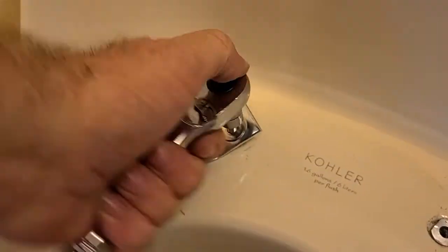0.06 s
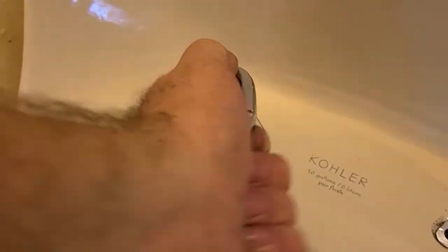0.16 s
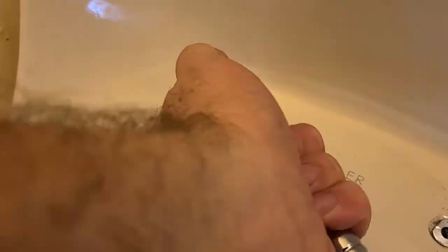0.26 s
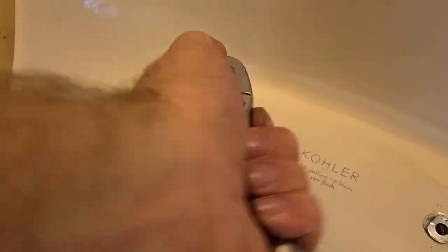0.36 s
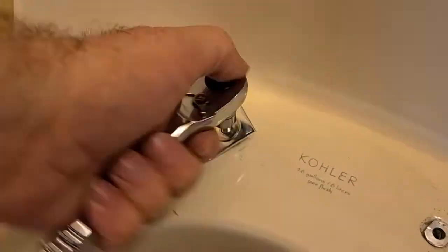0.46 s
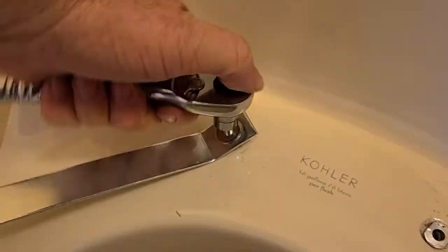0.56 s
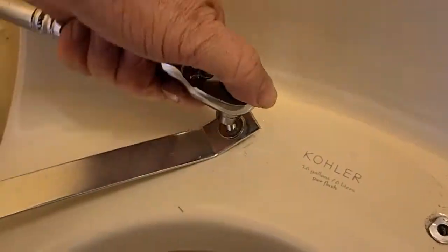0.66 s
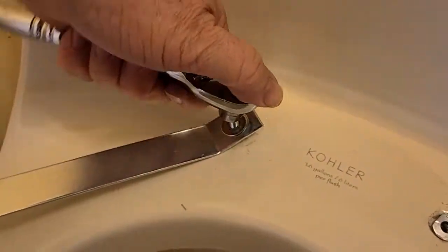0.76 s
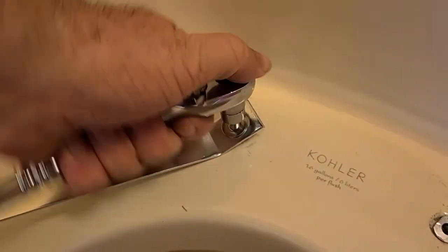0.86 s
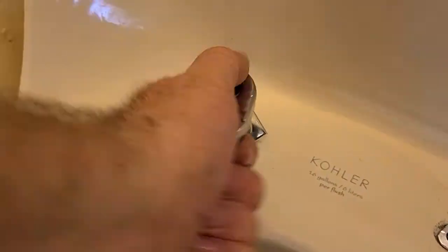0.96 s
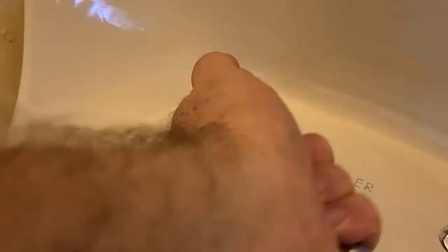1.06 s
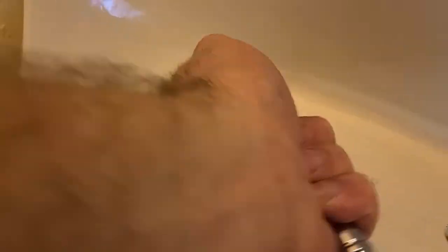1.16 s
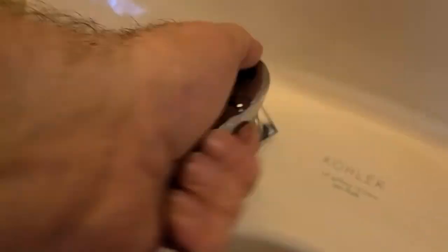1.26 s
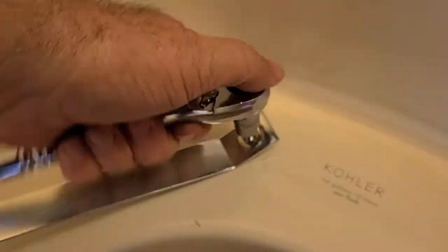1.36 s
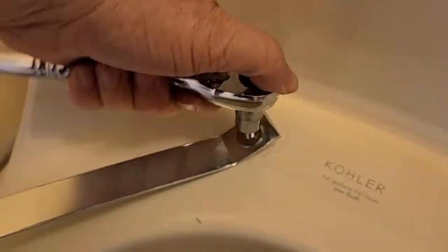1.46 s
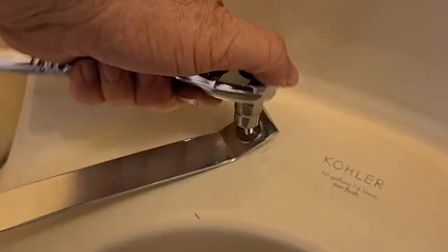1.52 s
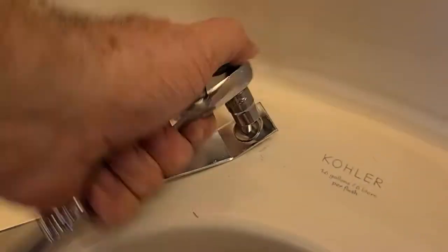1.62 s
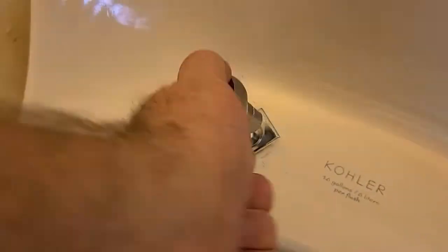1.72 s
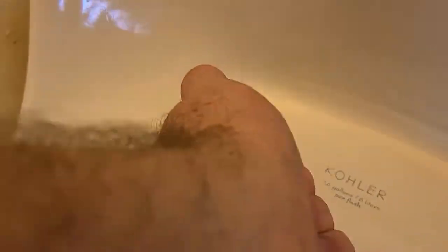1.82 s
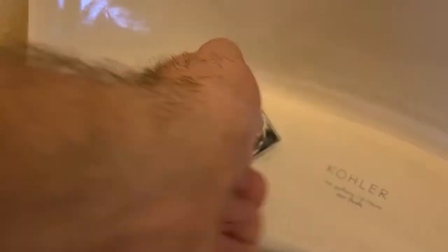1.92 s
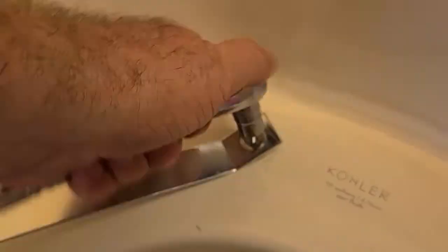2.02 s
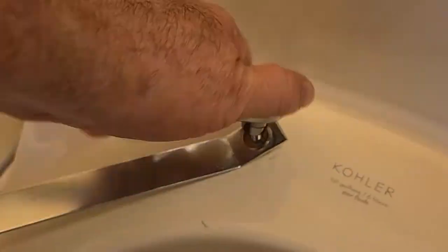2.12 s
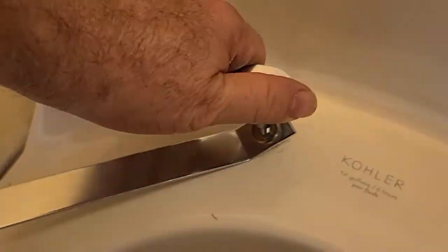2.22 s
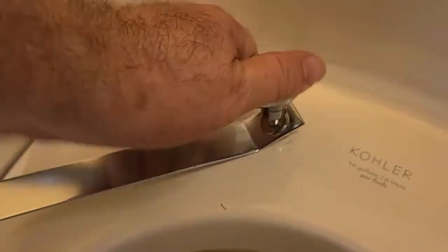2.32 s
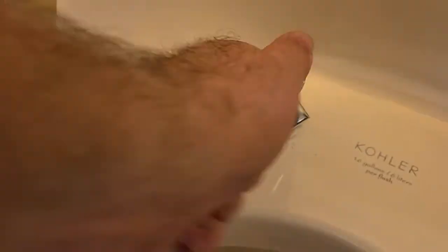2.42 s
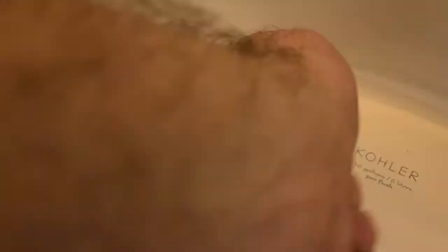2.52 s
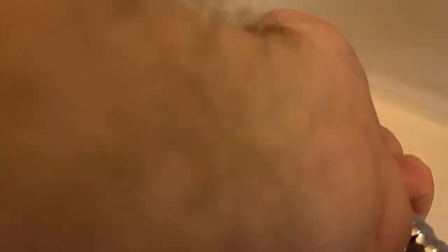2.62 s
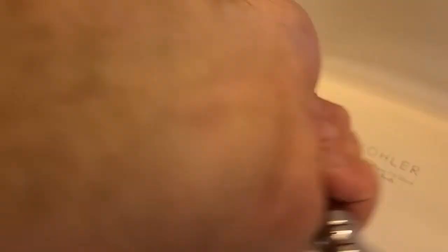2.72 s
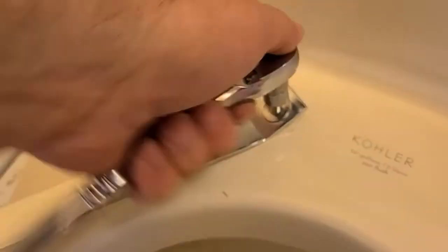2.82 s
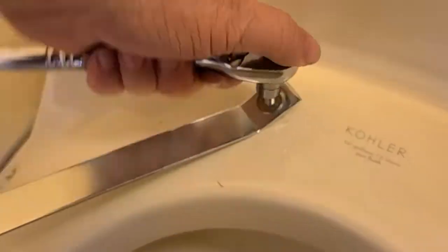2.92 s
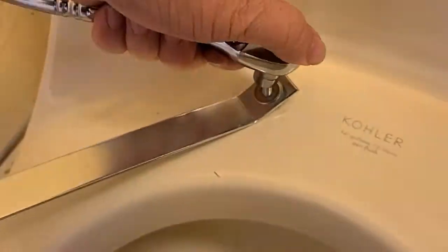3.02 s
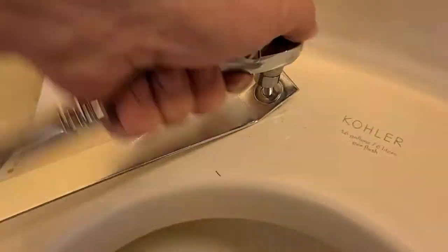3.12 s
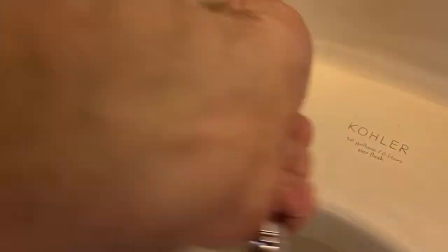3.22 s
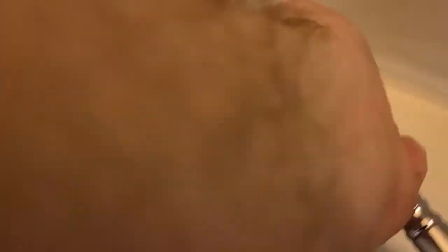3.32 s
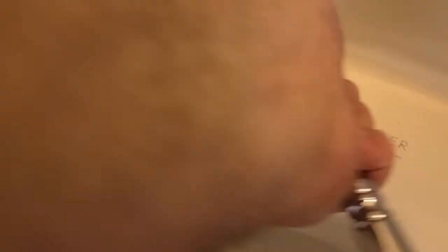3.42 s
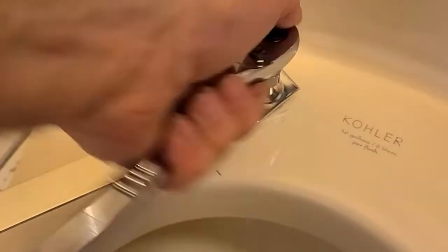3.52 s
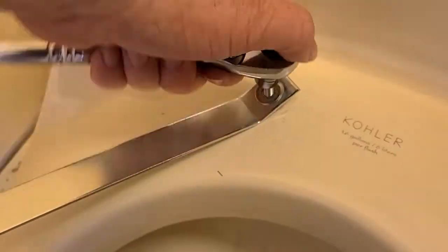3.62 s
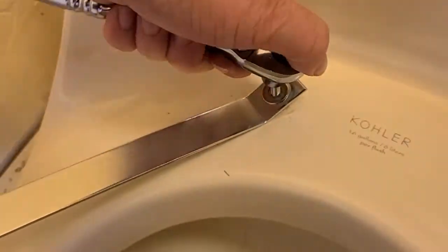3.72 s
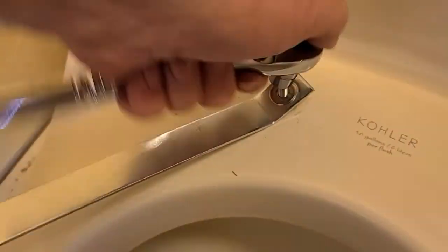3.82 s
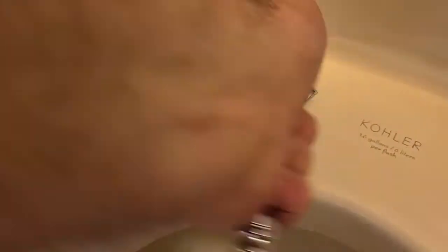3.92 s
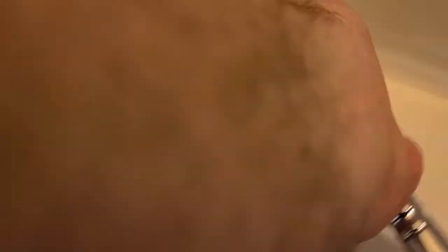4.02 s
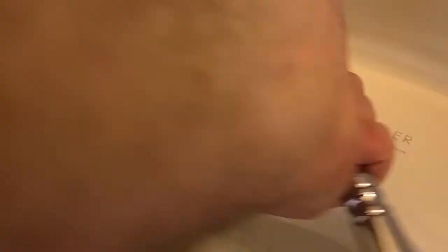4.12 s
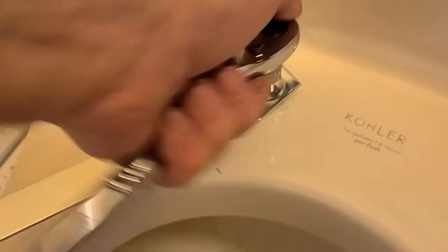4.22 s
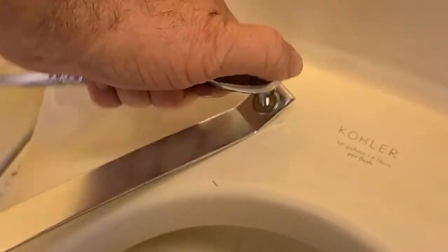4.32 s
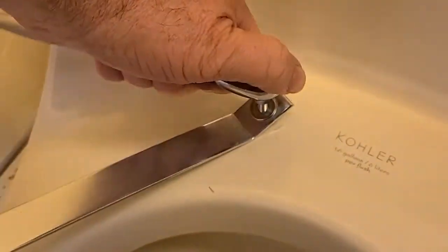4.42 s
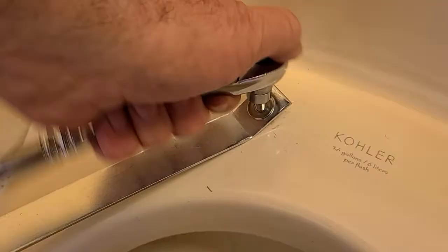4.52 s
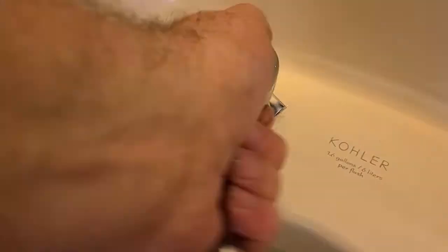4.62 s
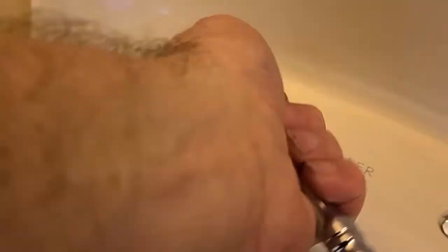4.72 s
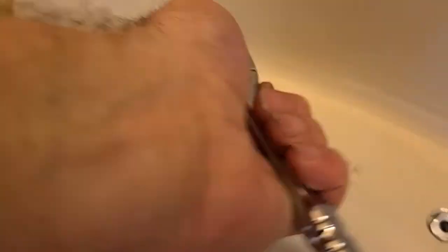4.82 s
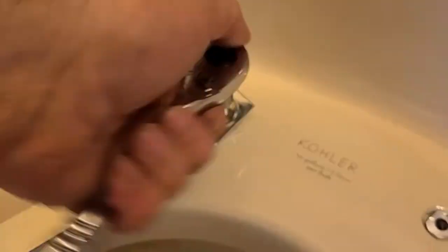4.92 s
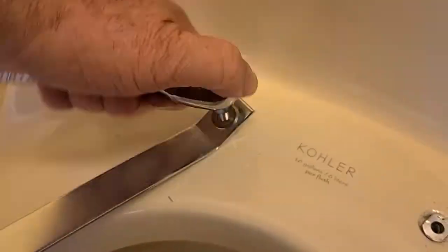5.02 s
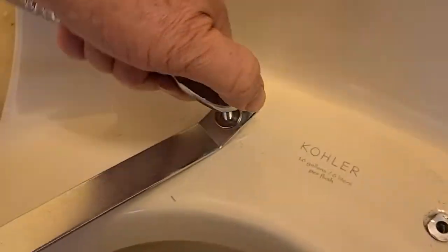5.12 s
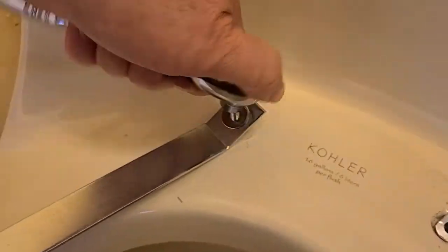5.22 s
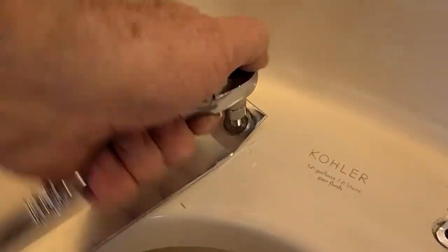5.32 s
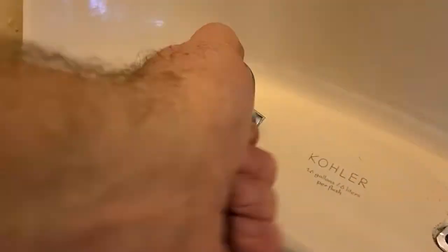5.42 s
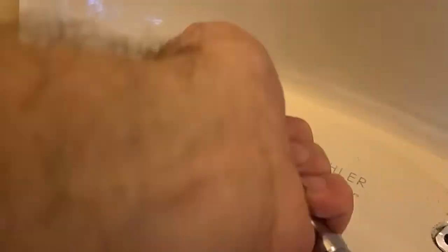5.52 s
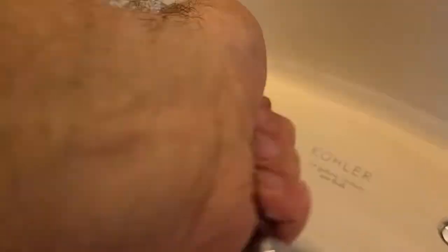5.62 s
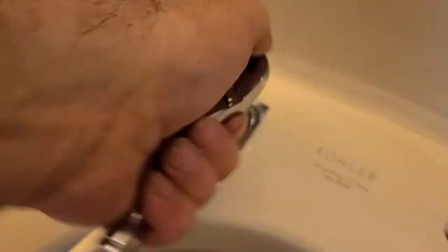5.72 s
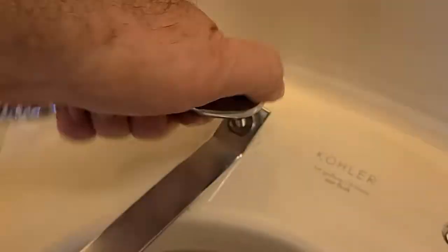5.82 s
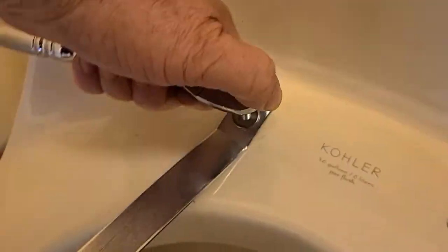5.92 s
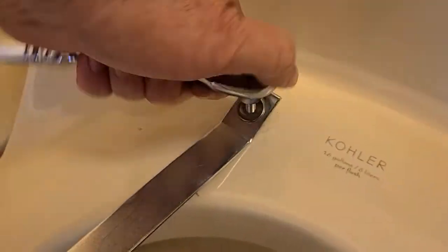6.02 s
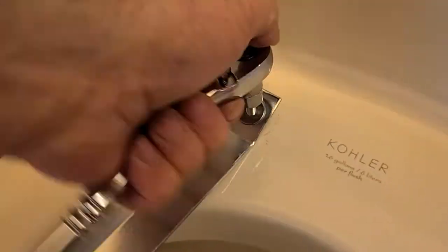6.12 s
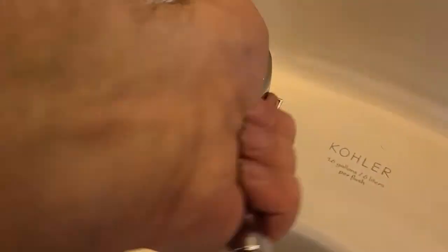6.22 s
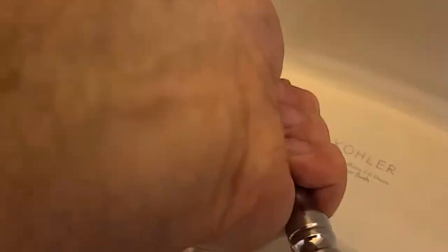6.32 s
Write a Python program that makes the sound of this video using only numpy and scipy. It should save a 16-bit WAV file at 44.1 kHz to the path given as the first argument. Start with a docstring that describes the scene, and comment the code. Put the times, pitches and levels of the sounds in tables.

```python
"""A socket ratchet tightens a bolt on a steel strap over a porcelain bowl, close by in a small tiled bathroom.
From the start a faint hum and rumble fill the room (sines, low noise), and the socket knocks on the bolt
(noise bursts, damped steel modes, bowl resonances). Soon come runs of pawl clicks, mostly fastest in mid-swing
(hard noise snaps, short modes of the head), with clicks placed one by one and more rattling among them.
The hand rubs in swells (uneven noise, tiny ticks); from the second run on, the microphone is jogged at times."""
import sys
import numpy as np
from scipy import signal
from scipy.fft import rfft, irfft, next_fast_len
from scipy.io import wavfile
from scipy.ndimage import map_coordinates

SR = 44100
rng = np.random.default_rng(int(sys.argv[2]) if len(sys.argv) > 2 else 0)


def master(y):
    """Save y as 16-bit WAV."""
    cut = np.clip(np.atleast_2d(y).T, -1, 1)
    pcm = np.round(cut * 32767)  # scale
    wavfile.write(sys.argv[1], SR, pcm.astype(np.int16))


N = 280455


def amp(db):
    """Level to amplitude ratio: 20 dB is a factor of ten."""
    return 10 ** (np.asarray(db) / 20)


def unit(x):
    """Normalisation to an rms of 1."""
    return x / np.sqrt(np.mean(x ** 2) + 1e-20)


def along(points, hz):
    """Interpolation of (freq_hz, value) points on a logarithmic frequency axis."""
    point_hz, values = np.transpose(points)
    return np.interp(np.log(hz + 1), np.log(point_hz + 1), values)


def filtered(x, response):
    """Linear filtering: the spectrum of x times a complex response of frequency."""
    m = next_fast_len(N + SR // 2)
    return irfft(rfft(x, m) * response(np.fft.rfftfreq(m, 1 / SR)), m)[..., :N]


def coloured(x, spectrum):
    """Minimum-phase filtering: folding the cepstrum makes the given spectrum causal, with unit power gain."""
    def response(hz):
        log_gain = np.log(unit(amp(along(spectrum, hz))))
        cepstrum = irfft(log_gain)
        half = len(cepstrum) // 2
        folded = np.r_[cepstrum[0], 2 * cepstrum[1:half]]
        return np.exp(rfft(folded, len(cepstrum)))
    return filtered(x, response)


def noise(length, alike):
    """Partly correlated stereo noise: the power share `alike` is common to both sides."""
    alike = np.clip(alike, 0, 1)
    common = np.sqrt(alike) * rng.standard_normal(length)
    return common + np.sqrt(1 - alike) * rng.standard_normal((2, length))


def fade(t, attack, t60):
    """Exponential decay by 60 dB in t60 after a rise with the time constant attack."""
    return (1 - np.exp(-t / attack)) * amp(-60 * t / t60)


def add(track, s, sound):
    """Superposition: mix a sound in at time s."""
    part = track[:, max(0, round(s * SR)):][:, :sound.shape[-1]]
    part += sound[..., :part.shape[-1]]


def ring(modes, t, pitch, scatter_db, detune, attack):
    """Modal synthesis: damped sines, with new strengths per blow and new phases per blow and side."""
    out = np.zeros((2, len(t)))
    for hz, db, t60 in modes:
        mode_hz = hz * pitch * (1 + detune * rng.normal())
        phase = 2 * np.pi * mode_hz * t + rng.normal(0, 1.0, (2, 1))
        strength = amp(db + scatter_db * rng.normal())
        out += strength * fade(t, attack, t60) * np.sin(phase)
    return out


def background():
    """Steady tones of mains hum stand over low broadband rumble of the room air."""
    # mains hum: freq_hz, rms_level_db
    hum_tones = [(59, -54.5), (120, -56)]
    # spectrum of the rumble: freq_hz, relative_db (per Hz)
    air_spectrum = [(20, -19), (60, -2), (125, -6), (190, -26.5), (450, -14.5), (650, -41), (1200, -31.5),
                    (2600, -43), (6800, -36), (8200, -51.5), (16000, -71.5)]
    t = np.arange(N) / SR
    hum = sum(amp(db) * np.sqrt(2) * np.sin(2 * np.pi * (hz * t + rng.random())) for hz, db in hum_tones)
    return hum + amp(-53.5) * coloured(noise(N, alike=0.5), air_spectrum)


def bathroom(x, near_db, near_t60, tail_db):
    """Reverberation: the small bowl reflects only short waves, in a quick cluster; the tiled walls ring on."""
    # decay time of the tiled walls: freq_hz, t60_s
    tile_decay = [(300, 0.23), (1000, 0.37), (3500, 0.23), (14000, 0.14)]
    # stereo width of the tiles' echo: freq_hz, side_over_middle (amplitude ratio)
    tile_width = [(250, 0.099), (600, 0.28), (1200, 1), (14000, 0.23)]
    hz, t, (middle, side) = signal.stft(rng.standard_normal((2, SR * 3 // 4)), SR, nperseg=256)
    side = side * along(tile_width, hz)[:, None]
    diffuse = np.array([middle + side, middle - side])
    decay = fade(t, 0.00067, along(tile_decay, hz)[:, None])
    tail = signal.istft(diffuse * decay, SR, nperseg=256)[1]
    near = rng.standard_normal(tail.shape) * fade(np.arange(tail.shape[1]) / SR, 0.003, near_t60)
    near = signal.lfilter(*signal.butter(2, 2500, "high", fs=SR), near)
    echoes = amp(near_db) * near / np.linalg.norm(near[0]) + amp(tail_db) * tail / np.linalg.norm(tail[0])
    return signal.fftconvolve(x, echoes, axes=1)[:, :N]


def bumps():
    """Handling noise: each jog of the hand-held microphone is a low, decaying thump."""
    # soft bumps: start_s, relative_db
    jogs = [(1.39, -47), (2.13, -41.5), (3.41, -49), (4.059, -45)]
    # spectrum of a bump: freq_hz, relative_db (per Hz)
    bump_spectrum = [(20, -16), (45, 14), (90, 7), (200, -76), (1000, -98.5)]
    t = np.arange(N) / SR
    level = sum(amp(db) * fade(np.maximum(t - s, 0), attack=0.02, t60=0.54) for s, db in jogs)
    return amp(10) * level * coloured(noise(N, alike=0.58), bump_spectrum)


def hand():
    """Sliding friction: skin on the handle makes an uneven hush that swells with each pull, and ticks at catches."""
    # rubs as the hand pulls: peak_s, relative_db
    rubs = [(1.08, -58), (2.2, -40), (3.4, -56.5), (4.08, -45.5), (4.82, -56), (5.35, -51)]
    # spectrum of the hush: freq_hz, relative_db (per Hz)
    skin_spectrum = [(200, 8.5), (450, 5), (800, 3), (1300, 0), (2000, -4), (3000, -6), (6000, -20.5),
                     (16000, -40)]
    # spectrum of the ticks: freq_hz, relative_db (per Hz)
    tick_spectrum = [(200, -0.5), (1200, -12.5), (2000, 7), (2600, -11), (3600, 10), (4500, -10.5),
                     (7000, -21), (12000, -33.5)]
    rest_db, slope_db_per_s = -60.5, 74  # resting grip; fall to either side of a rub
    flutter_db, ticks_per_s = 2.5, 10  # unevenness of the sliding; mean rate of the catches
    t = np.arange(N) / SR
    level = amp(rest_db) + sum(amp(db - slope_db_per_s * np.abs(t - s)) for s, db in rubs)
    unevenness = map_coordinates(rng.standard_normal(N // 1024 + 4), [np.arange(N) / 1024])
    hush = amp(flutter_db * unevenness) * coloured(noise(N, alike=0.3), skin_spectrum)
    catches = (rng.random(N) < ticks_per_s / SR) * amp(5.9 * rng.standard_normal(N))
    tick_level = signal.fftconvolve(catches, fade(t[:SR // 20], attack=0.00064, t60=0.025))[:N]
    ticks = tick_level * noise(N, alike=0.8)
    return level * (hush + coloured(ticks, tick_spectrum))


def bowl(force):
    """Forced resonance: the porcelain answers a force as a sum of band-pass modes of alternating sign."""
    # resonances of the porcelain: centre_hz, width_hz, relative_db
    resonances = [(150, 35, -12), (270, 100, -10), (380, 90, -7), (472, 30, 2), (640, 55, -1), (767, 30, 3),
                  (1130, 170, -1.5), (1995, 50, -3)]

    def response(f):
        total = 0
        for k, (centre, width, db) in enumerate(resonances):
            damping = 1j * f * width
            total = total + (-1) ** k * amp(db) * damping / (centre * centre - f * f + damping)
        return unit(total)
    return filtered(force, response)


def socket():
    """Impact excitation: loose steel slips and chatters on the bolt, rings on, and thumps the bowl."""
    # knocks of socket and strap: start_s, contacts, clank_db, thud_db (relative)
    knocks = [(0.026, 1, -36.5, -44.5), (0.347, 1, -44, -50), (0.635, 1, -43, -42.5),
              (0.831, 1, -43.5, -54), (0.901, 1, -48, -46.5), (1.195, 1, -42, -49), (1.594, 1, -33, -33.5),
              (1.669, 1, -41.5, -40.5), (1.924, 1, -34.5, -40), (2.174, 2, -22, -34),
              (2.412, 4, -11.5, -37), (2.547, 1, -26.5, -44.5), (2.983, 1, -32, -34.5),
              (3.321, 1, -36.5, -37.5), (3.377, 1, -43, -57.5), (3.422, 1, -40.5, -50),
              (4.106, 1, -37.5, -39.5), (4.129, 1, -32, -44), (4.503, 1, -26.5, -31), (4.707, 1, -39, -49),
              (5.233, 1, -32.5, -49), (5.299, 1, -28, -50), (5.314, 1, -18.5, -34), (5.459, 2, -22, -41.5),
              (5.528, 1, -27, -41.5), (5.591, 1, -34.5, -41.5), (6.139, 2, -34.5, -44)]
    # spectrum of the chatter: freq_hz, relative_db (per Hz)
    clank_spectrum = [(300, -48), (900, -18.5), (1600, -17), (2100, -15.5), (3400, -3), (4100, -8.5),
                      (5200, -3), (7700, -13), (11000, -16.5), (14000, -9), (16000, -29)]
    # free ring of socket and strap: freq_hz (before detuning), relative_db, t60_s
    steel_modes = [(1995, -11, .19), (2270, -15, .14), (2950, -12, .14), (3230, -4, .2), (3600, -7, .15),
                   (4930, -8, .14), (5232, 1.5, .19), (5700, -7, .12), (7002, -2, .16), (7564, -7, .11),
                   (9100, -4, .16), (10945, -1, .16), (13200, -2, .14), (13830, 1, .12)]
    # force of a knock on the bowl: freq_hz, relative_db (per Hz)
    thud_spectrum = [(100, -2), (280, -0.5), (480, -1.5), (700, -5), (1100, -9), (2000, 0), (5000, -8.5)]
    rattle_gap_s, rattle_loss_db = 0.0195, 0.75  # from one contact of a rattle to the next
    slip_db, slip_t60_s = -11.5, 0.053  # the socket slides a moment before it strikes
    # under a light touch the steel stays seated and rings less
    steel_db, firm_db, steel_grows = -7.5, -18, 0.35  # ring at a firm clank; that clank; dB per dB of clank
    chatter, rings, thuds = np.zeros((3, 2, N))
    t = np.arange(SR // 2) / SR
    contacts = []
    for s, count, clank_db, thud_db in knocks:
        for k in range(round(count)):
            loss_db = k * rattle_loss_db
            contacts.append((s + k * rattle_gap_s, clank_db - loss_db, thud_db - loss_db))
    strike_level = fade(t, attack=0.002, t60=0.043)
    for s, clank_db, thud_db in contacts:
        cutoff_hz = 6000 * amp((clank_db + 21.5) * 0.5)  # light blows are duller
        pole = np.exp(-2 * np.pi * cutoff_hz / SR)
        soften = lambda x: signal.lfilter([1 - pole], [1, -pole], x)
        slip_level = amp(clank_db + slip_db - 60 * t[::-1] / slip_t60_s)  # grows up to the strike
        add(chatter, s - len(t) / SR, slip_level * soften(noise(len(t), alike=1.0)))
        strike = soften(strike_level * noise(len(t), alike=0.33))
        add(chatter, s, amp(clank_db + 6.5) * strike)
        steel = ring(steel_modes, t, 1, scatter_db=3, detune=0.002, attack=0.002)
        ring_db = clank_db + steel_db + steel_grows * (clank_db - firm_db)
        add(rings, s, amp(ring_db) * soften(steel))
        thud = fade(t, attack=0.0013, t60=0.12) * noise(len(t), alike=0.82)
        add(thuds, s, amp(thud_db - 16) * thud)
    return coloured(chatter, clank_spectrum) + rings + bowl(coloured(thuds, thud_spectrum))


def teeth():
    """Kinematics: evenly angled teeth pass as the swing changes speed; gives (s, snap dB, ring dB, jolt dB)."""
    # runs of the pawl: first_s, last_s, teeth, start_speed, end_speed (shares of top speed),
    # top_place (0-1 of the run), snap_db, ring_db (relative, at its loudest), loudest_s (into the run)
    strokes = [(0.426, 0.633, 22, .45, .3, 0.48, -18.5, -15.5, 0.052),
               (1.25, 1.504, 23, 0.64, .212, 0.35, -18.5, -17, 0.053),
               (2.151, 2.243, 6, 1, .75, 0.29, -17, -23.5, 0.061),
               (2.772, 2.804, 3, 0.96, 1, 0.78, -20.5, -21, 0.041),
               (2.833, 2.974, 15, 0.2, .151, 0.23, -20, -20.5, 0.029),
               (3.497, 3.734, 24, 0.73, .079, 0.4, -19, -20, 0.069),
               (4.199, 4.400, 22, .637, 0.11, .43, -19, -18.5, 0.1),
               (4.905, 5.116, 25, 0.45, .105, 0.55, -19, -14, .055),
               (5.7, 5.751, 5, 0.7, 1, 0.48, -16, -24.5, 0.025),
               (5.779, 5.902, 15, 0.57, .7, 0.66, -17.5, -16, .05)]
    # clicks placed one by one, lone ones and some at the ends of runs: start_s, snap_db, ring_db (relative)
    clicks = [(0.654, -14, -31.5), (0.672, -17.5, -29), (0.711, -18.5, -29), (1.552, -23.5, -34),
              (1.953, -17.5, -18.5), (2.014, -20, -14.5), (2.120, -20, -29.5), (2.27, -18, -23),
              (3.005, -25, -28.5), (3.04, -16.5, -29), (3.77, -19.5, -33), (4.435, -20, -31),
              (5.161, -17.5, -29), (5.679, -19, -31.5), (5.916, -25.5, -22), (5.931, -20.5, -24)]
    rise_db_per_s, fall_db_per_s = 78.5, 95.5  # the head rings most freely early in the swing
    snap_scatter_db, ring_scatter_db = 1.8, 2  # from tooth to tooth
    # share of each snap that the bolt passes to the bowl; it grows along the run
    jolt_db, jolt_grows_db_per_s = -36.5, 15
    drops = [(s, snap_db, ring_db, jolt_db + 4.5) for s, snap_db, ring_db in clicks]
    u = np.linspace(0, 1, 400)  # place in the run
    for start, end, count, first, last, top, snap_db, ring_db, loudest in strokes:
        speeding = 1 - (1 - first) * (1 - u / top) ** 2
        slowing = 1 - (1 - last) * ((u - top) / (1 - top)) ** 2
        angle = np.cumsum(np.where(u < top, speeding, slowing))
        tooth_angles = np.linspace(angle[0], angle[-1], round(count))
        for t in (end - start) * np.interp(tooth_angles, angle, u):
            damped_db = max(rise_db_per_s * (loudest - t), fall_db_per_s * (t - loudest))
            tooth_snap_db = snap_db + snap_scatter_db * rng.normal()
            tooth_ring_db = ring_db - damped_db + ring_scatter_db * rng.normal()
            drops.append((start + t, tooth_snap_db, tooth_ring_db, jolt_db + jolt_grows_db_per_s * t))
    return drops


def ratchet():
    """Impulsive release: the pawl drops off each tooth with a hard snap and rings the head briefly."""
    # spectrum of a snap: freq_hz, relative_db (per Hz)
    snap_spectrum = [(100, -55.5), (300, -50), (750, -22), (1200, -5.5), (1650, -6), (2400, -1.5),
                     (3500, 1.5), (6200, 6.5), (7700, 0), (9600, -5.5), (11000, 10), (12500, -3.5),
                     (14500, 6.5), (16000, -22)]
    # short modes of the hand-damped head: freq_hz (before detuning), relative_db, t60_s
    head_modes = [(3300, -3, .02), (3720, 0, .017), (4050, -5, .014), (4750, -8, .012), (6100, -4.5, .015),
                  (10950, -14, .016)]
    # the small head radiates no long waves: freq_hz, gain_db
    head_radiation = [(1500, -30.5), (2650, -10), (3150, -1.5), (16000, 3.5)]
    # the pawl seats differently on every tooth: shares of pitch for the whole head and for each mode
    seat_spread, mode_spread = 0.025, 0.015
    snaps, rings, jolts = np.zeros((3, 2, N))
    t = np.arange(SR // 16) / SR
    lead_in = amp(-60 * t[::-1] / 0.042)  # a short noise rise leads into the snap
    for s, snap_db, ring_db, jolt_db in teeth():
        add(snaps, s - len(t) / SR, amp(snap_db - 18) * lead_in * noise(len(t), alike=1.0))
        snap_level = amp(snap_db + 14) * fade(t, attack=0.002, t60=0.0095)
        add(snaps, s, snap_level * noise(len(t), alike=0.58))
        add(jolts, s, amp(jolt_db) * snap_level * noise(len(t), alike=1.0))
        pitch = 1 + seat_spread * rng.normal()
        head = ring(head_modes, t, pitch, scatter_db=2.2, detune=mode_spread, attack=0.0011)
        add(rings, s, amp(ring_db + 10.5) * head)
    radiated = filtered(rings, lambda hz: amp(along(head_radiation, hz)))
    return coloured(snaps, snap_spectrum) + radiated + bowl(jolts)


def scene():
    """Superposition of direct sound, echoes and room, placed by differences of time and level between the sides."""
    # balance of the sides: freq_hz, left_minus_right_db
    balance = [(300, 0.5), (1000, -2), (2500, -5.5), (5000, -8), (8000, 2.5), (13000, -5)]
    tool = ratchet() + socket()
    lead_s = 0.0003266  # by which the direct sound reaches the left side first
    sides = np.array([[-1], [1]])
    direct = filtered(tool, lambda hz: np.exp(-1j * np.pi * hz * lead_s * sides))
    echoes = bathroom(tool, near_db=-5.5, near_t60=0.03, tail_db=-5.5)
    heard = direct + echoes + hand()
    balanced = filtered(heard, lambda hz: amp(along(balance, hz) * -sides / 2))
    return amp(-1.0) * balanced + bumps() + background()


def record(dry):
    """Band limiting: a steep zero-phase low-pass, at half power at its limit."""
    limit_hz = 16000
    return filtered(dry, lambda hz: 1 / np.sqrt(1 + (hz / limit_hz) ** 120))


dry = scene()
out = record(dry)
master(out)
```